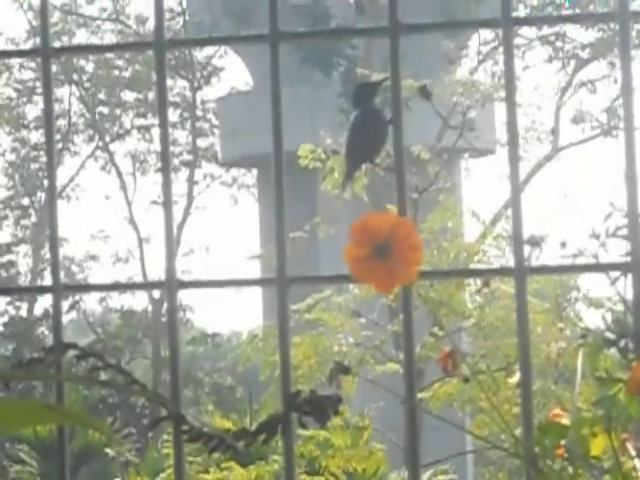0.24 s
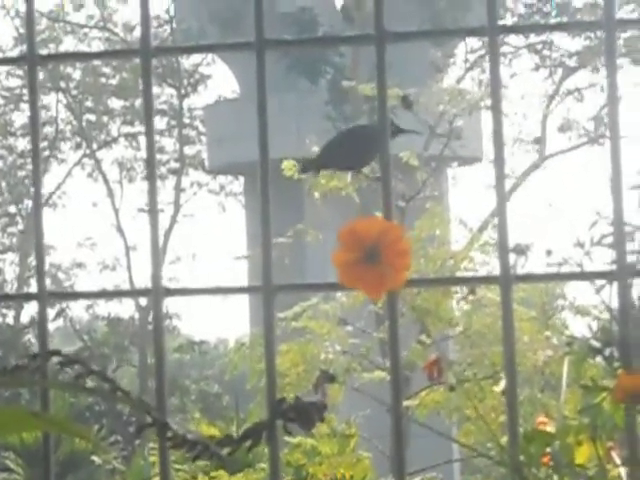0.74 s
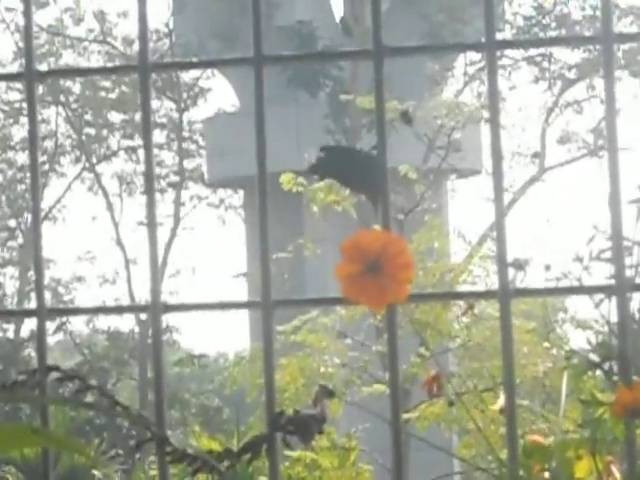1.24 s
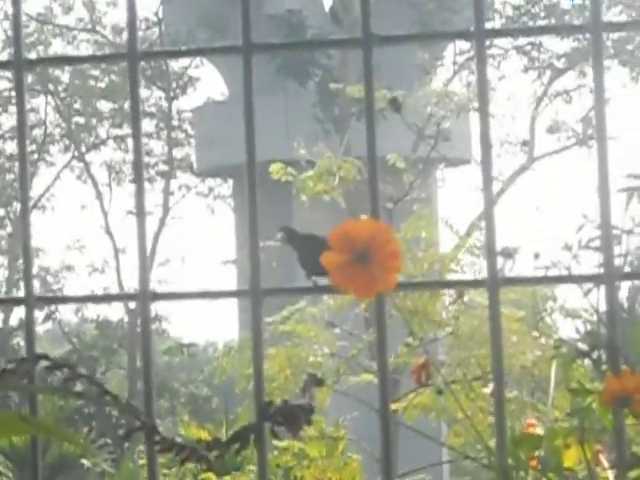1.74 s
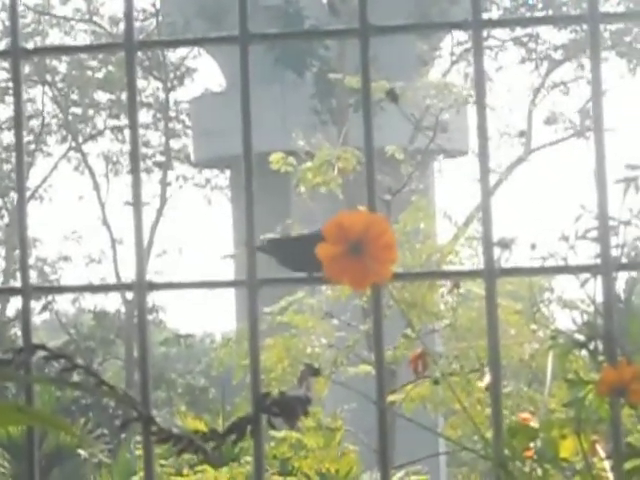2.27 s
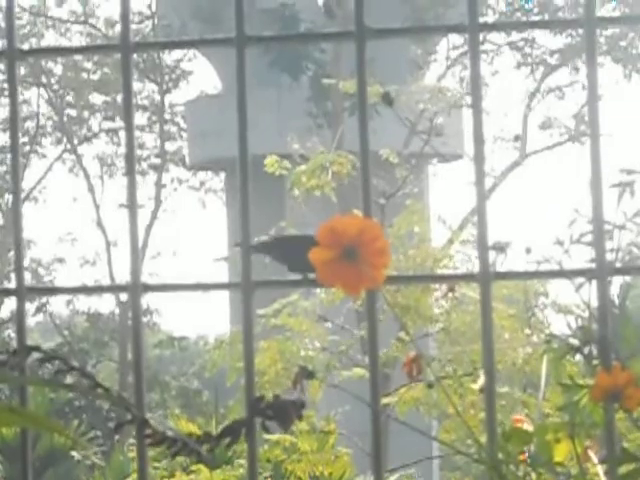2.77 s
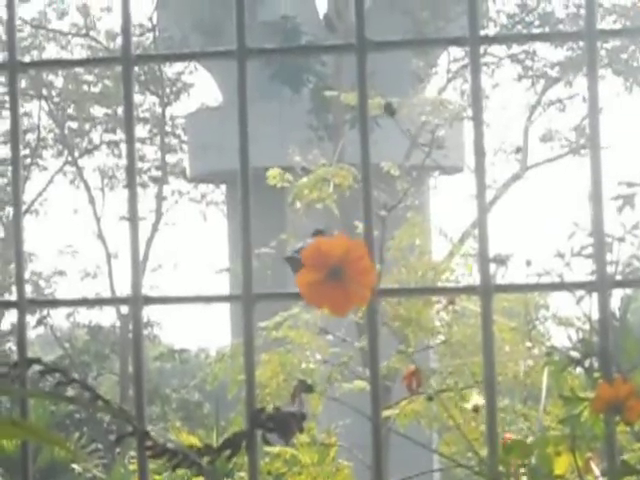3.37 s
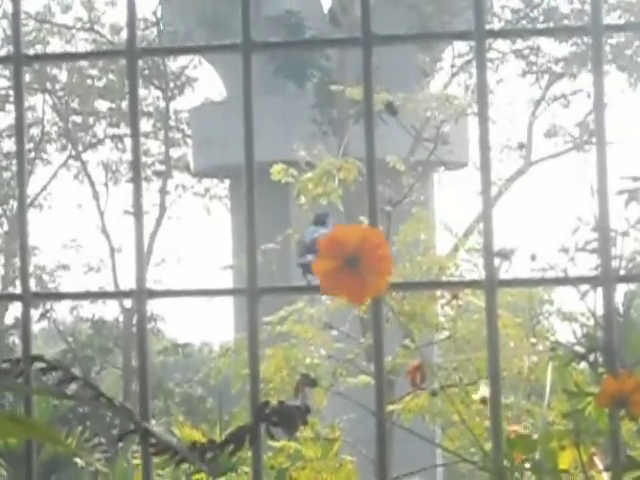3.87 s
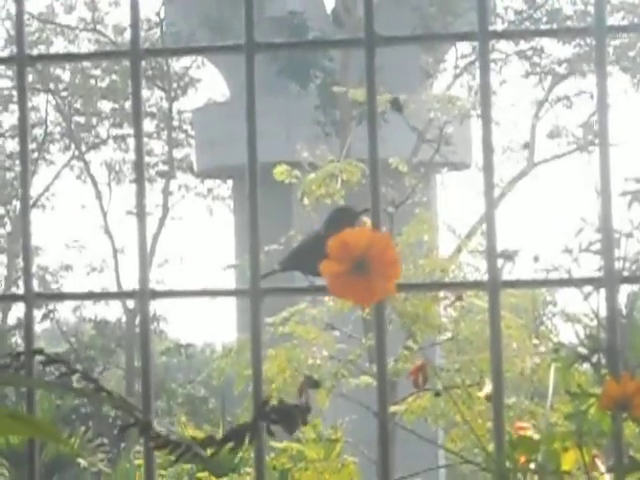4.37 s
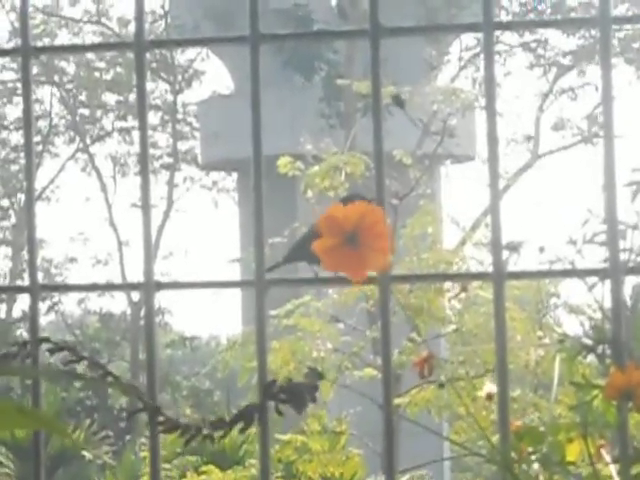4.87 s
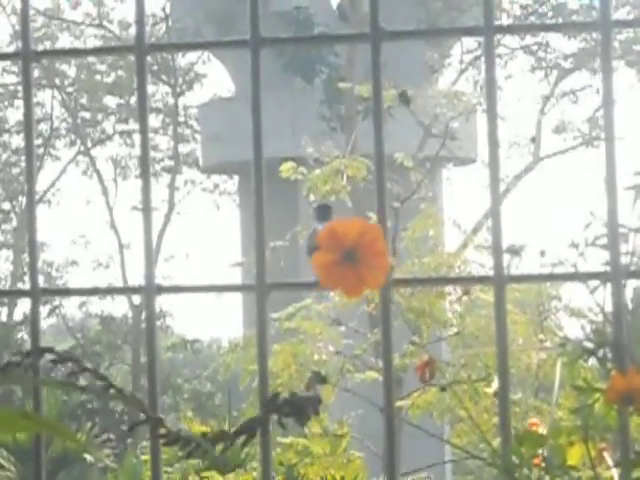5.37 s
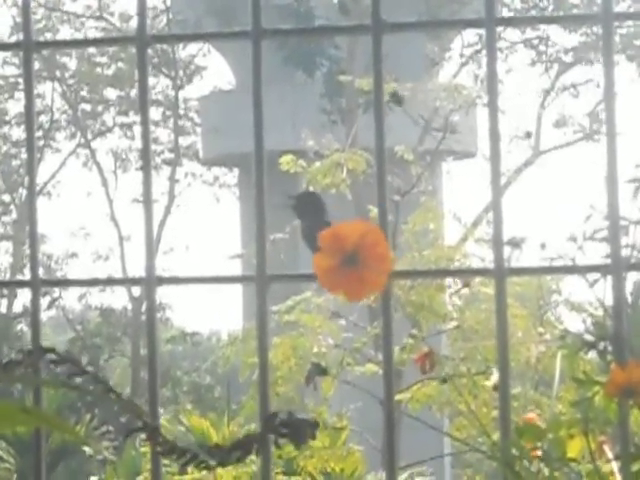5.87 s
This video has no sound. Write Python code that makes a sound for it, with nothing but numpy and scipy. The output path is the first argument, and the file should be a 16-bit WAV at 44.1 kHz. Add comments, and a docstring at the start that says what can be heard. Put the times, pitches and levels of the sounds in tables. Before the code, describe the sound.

Outdoor handheld pickup with a slightly rough, band-limited treble: low rumble, soft hiss and wind buffeting lie beneath a near bird's piercing upward chips. The calls are sparse at first, then repeat about every half second from the middle onward, with brief hard-surface reflections. Faint low chuckles and single pips from far birds continue throughout, with two soft coos and a few muffled thuds in the first half.

```python
"""A small bird close by gives rising chip calls: a harsh tick (shaped noise), a fast warble (frequency modulation),
then an upward whistle (a gliding tone with its octave) that ends in a puff of air. Walls throw each call back.
Far off, birds chuckle and pip and a dove-like voice coos (gliding near sines), and something thuds (dying noise).
Under it lie garden rumble, hiss and wind (filtered noise); this background drops half-way through."""
import sys
import numpy as np
from scipy import signal
from scipy.fft import rfft, irfft
from scipy.io import wavfile
from scipy.ndimage import uniform_filter1d

SR = 44100
rng = np.random.default_rng(int(sys.argv[2]) if len(sys.argv) > 2 else 0)


def dump_mix(stems):
    """Bounce the given channels to the path in sys.argv[1] as a 16-bit WAV at rate SR."""
    frames = np.atleast_2d(stems).T  # one column per channel
    limited = np.clip(frames, -1, 1)  # hard clip at full scale
    pcm = np.round(limited * 32767).astype(np.int16)
    wavfile.write(sys.argv[1], SR, pcm)


N = 269892
LEAD = SR // 10   # samples before time zero, for sounds already under way


def from_db(db):
    """Logarithmic level: decibels to amplitude gain."""
    return 10 ** (np.asarray(db) / 20)


def rms_one(x):
    """Normalisation of power: scales a signal to rms 1."""
    return x / np.sqrt(np.mean(x ** 2) + 1e-20)


def coloured(spectrum, size):
    """Spectral shaping: white noise weighted by (Hz, relative dB) points, rms 1."""
    hz = np.fft.rfftfreq(size, 1 / SR) + 1
    points = np.array(spectrum)
    gain = from_db(np.interp(np.log(hz), np.log(points[:, 0]), points[:, 1]))
    return rms_one(irfft(rfft(rng.standard_normal(size)) * gain, size))


def wobble(rate_hz, size):
    """Low-passed random fluctuation: sway mostly slower than rate_hz, rms 1."""
    lowpass = signal.butter(2, rate_hz, fs=SR, output="sos")
    settling = 4000   # samples thrown away
    return rms_one(signal.sosfilt(lowpass, rng.standard_normal(size + settling))[settling:])


def add(out, start_s, sound):
    """Superposition: mixes a sound into a buffer that begins before time zero."""
    i = LEAD + round(start_s * SR)
    out[i:i + len(sound)] += sound[:max(len(out) - i, 0)]


def sung(hz, level_db, overtone_db, edge_s):
    """Phase is the integral of frequency: a near sine with its octave, and a twelfth on low notes."""
    phase = 2 * np.pi * (np.cumsum(hz) / SR + rng.random())
    t = np.arange(len(hz)) / SR
    fade = np.clip(np.minimum(t, t[-1] - t) / edge_s, 0, 1)
    twelfth = 0.35 * np.sin(3 * phase) * (hz < 4000)
    overtones = from_db(overtone_db) * (np.sin(2 * phase) + twelfth)
    return np.sqrt(2) * fade * from_db(level_db) * (np.sin(phase) + overtones)


def echoes(x, t60_s, gap_s):
    """Reverberation as convolution: clumped, exponentially dying reflections after a gap, power 1."""
    t = np.arange(SR) / SR
    clumps = from_db(1.9 * wobble(210, SR))
    tail = rng.standard_normal(SR) * clumps * from_db(-60 * t / t60_s) * (t > gap_s)
    # walls and leaves swallow the treble
    tail = signal.sosfilt(signal.butter(2, 7500, fs=SR, output="sos"), tail)
    return signal.fftconvolve(x, tail / np.sqrt(np.sum(tail ** 2)))[:len(x)]


# Noise spectra of the background. Each row: frequency in Hz, relative density in dB per Hz.
RUMBLE_SPECTRUM = [(41, -38), (70, 1.5), (124, -3), (189, -1.5), (599, -4.5), (808, -5.5), (1200, -5),
                   (1800, -32), (2340, -33), (3960, -120)]
HISS_SPECTRUM = [(820, -33), (1400, -3), (2110, -4), (2520, -5), (3130, -6), (3960, -5), (4730, -7),
                 (6690, -9.5), (8700, -12.5)]
# Background levels, joined by straight lines.
# Each row: time in seconds, rumble in dB before its swell, hiss in dB, wind in dB before its gusts.
BACKGROUND_LEVELS = [(0, -44.5, -51, -54), (.5, -50.5, -53.5, -55.5), (1.05, -48.5, -50.5, -58.5),
                     (1.15, -46.5, -53.5, -52), (1.5, -45, -52, -49), (1.9, -49, -49.5, -50),
                     (2.7, -46.5, -49.5, -51), (3.37, -47, -46.5, -56), (3.385, -53, -54.5, -56),
                     (4.9, -56, -54.5, -67), (6.12, -53.5, -53.5, -58.5)]


def garden():
    """Broadband noise in three bands: traffic rumble, leaf and microphone hiss, lumpy wind on the port."""
    s, *levels = np.transpose(BACKGROUND_LEVELS)
    t = np.arange(N) / SR
    rumble_db, hiss_db, wind_db = [np.interp(t, s, column) for column in levels]
    swell_db = .9 * wobble(5, N)
    gusts_db = 2.7 * wobble(4.2, N)
    rumble = from_db(rumble_db + swell_db) * coloured(RUMBLE_SPECTRUM, N)
    hiss = from_db(hiss_db) * coloured(HISS_SPECTRUM, N)
    wind = coloured([(14, -27.5), (25, 1.0), (48, -3.0), (90, -30.0)], N)
    return rumble + hiss + from_db(wind_db + gusts_db) * wind


# Spectrum of a dull blow. Each row: frequency in Hz, relative density in dB per Hz.
THUD_SPECTRUM = [(200, -19), (380, 2), (550, 8), (800, 0.5), (1200, 6), (1600, -5), (2300, -30)]
# Far blows. Each row: start in seconds, relative level in dB.
THUD_STARTS = [(-.02, -45), (.982, -39.5), (1.06, -45)]


def thuds():
    """Double-slope decay: dull blows far away, with a sharp start and a rolling tail."""
    out, t = np.zeros(N + LEAD), np.arange(SR // 2) / SR
    for start_s, level_db in THUD_STARTS:
        dying = from_db(-60 * t / 0.43) + .5 * from_db(-60 * t / 0.93)
        attack = np.minimum(t / 0.0032, 1)
        add(out, start_s, from_db(level_db) * attack * dying * coloured(THUD_SPECTRUM, len(t)))
    return out


# Far coos and thin whistles. Each row: start in seconds, length in seconds, starting pitch in Hz,
# slide in Hz per second, starting level in dB before flutter, level change in dB per second.
COOS_AND_THIN_WHISTLES = [(1.602, 0.7, 761.4, -140, -53.5, 2), (2.66, 0.64, 776.6, -170, -48.5, -12.5),
                          (.2, 0.081, 4350, 900, -59, -40), (0.467, 0.06, 4340, -1500, -57, -250),
                          (0.815, 0.066, 6050, -500, -48, -75), (.905, 0.17, 6020, 145, -58, -51),
                          (2.43, 0.081, 2680, -4000, -55.5, -40), (2.79, 0.071, 4250, -9000, -56.5, -38)]


def coos_and_thin_whistles():
    """Slow frequency and amplitude modulation: wavering, sliding notes from far birds."""
    out = np.zeros(N + LEAD)
    for start_s, length_s, hz, slide, level_db, fade in COOS_AND_THIN_WHISTLES:
        t = np.arange(0, length_s, 1 / SR)
        flutter_db = 3.5 * wobble(45, len(t))
        wavering_hz = hz + slide * t + hz ** .5 * wobble(60, len(t))
        add(out, start_s, sung(wavering_hz, level_db + fade * t + flutter_db, -37.5, 0.0088))
    return out


# Two phrases of three notes that one far bird alternates.
# Each row: delay after the phrase start in seconds, pitch in Hz early in the note, relative level in dB.
CHUCKLE_NOTES = [(0, 1256, -0.5), (.092, 1060, 0), (.16, 1203, -4)]
TUMBLE_NOTES = [(0, 1220, 0), (.082, 1070, -1.2), (.168, 1100, -1.5)]
# Starts of the two phrases, and of a second far bird's single higher note at a steady pace.
# Each row: start in seconds, relative level in dB.
CHUCKLE_STARTS = [(-.05, -41), (.74, -44), (1.489, -49), (2.247, -39.5), (3.026, -38), (3.783, -46),
                  (4.551, -47), (5.325, -44), (6.074, -43.5)]
TUMBLE_STARTS = [(.31, -46), (1.81, -46), (1.89, -45), (2.662, -39.5), (3.446, -45), (4.222, -44.5),
                 (4.995, -47), (5.771, -48)]
PIP_STARTS = [(.798, -43), (1.647, -41.5), (2.502, -38.5), (3.369, -47), (4.224, -46.5), (5.069, -51.5),
              (5.908, -51)]
PIP_HZ, NOTE_SPREAD_DB = 1330, 1.5
CHUCKLE_FALL, TUMBLE_FALL, PIP_FALL = 4.8, 9.3, 6.4   # fraction of the pitch lost per second


def chuckles_and_pips():
    """Downward frequency glide: short falling notes in chuckles, tumbles and pips."""
    out, t = np.zeros(N + LEAD), np.arange(0, .035, 1 / SR)
    phrases = [(CHUCKLE_NOTES, CHUCKLE_FALL, CHUCKLE_STARTS),
               (TUMBLE_NOTES, TUMBLE_FALL, TUMBLE_STARTS),
               ([(0, PIP_HZ, 0)], PIP_FALL, PIP_STARTS)]
    for notes, fall, starts in phrases:
        for start_s, phrase_db in starts:
            for delay_s, hz, note_db in notes:
                level_db = phrase_db + note_db - 7.5 + NOTE_SPREAD_DB * rng.standard_normal()
                falling_hz = hz * (1 - fall * (t - .014))
                add(out, start_s + delay_s - .004, sung(falling_hz, level_db, -28.5, 0.011))
    return out


# Harsh ticks that open the calls. Each row: start in seconds, relative level in dB, centre of the band in Hz.
TICK_STARTS = [(0.749, -44, 6400), (1.328, -34, 5480), (3.216, -30, 5300), (3.547, -36.5, 5220),
               (3.895, -36, 4960), (4.518, -36, 5380), (5.125, -36, 5130), (5.706, -35.5, 5370),
               (6.033, -34, 5240)]


def ticks():
    """Band-limited noise burst: a rasp that swells quickly and closes more slowly."""
    out, t = np.zeros(N + LEAD), np.arange(0, .04, 1 / SR)
    for start_s, level_db, hz in TICK_STARTS:
        band = [(0.5 * hz, -36), (0.82 * hz, 0), (1.17 * hz, -3), (1.5 * hz, -15), (1.99 * hz, -24)]
        swell = np.sin(np.pi * (t / t[-1]) ** 0.6)
        add(out, start_s, from_db(level_db) * swell * coloured(band, len(t)))
    return out


# Warbles between tick and whistle.
# Each row: start in seconds, length in seconds, relative level in dB, low pitch in Hz before jitter.
WARBLE_STARTS = [(0.784, 0.017, -40, 4750), (.785, 0.048, -55.5, 2470), (1.367, 0.028, -40.5, 2940),
                 (3.265, 0.013, -37, 3620), (3.588, 0.033, -32.5, 3580), (3.932, 0.035, -33, 3705),
                 (4.558, 0.035, -29.5, 3930), (5.159, 0.037, -31.5, 3810), (5.741, 0.033, -25.5, 4094),
                 (6.063, 0.041, -30.5, 3780)]
SWINGS_PER_S, WARBLE_SPAN = 62, 1.62   # the span is high pitch over low pitch


def warbles():
    """Periodic frequency modulation: the voice swings fast between two pitches, weaker at the upper."""
    out = np.zeros(N + LEAD)
    for start_s, length_s, level_db, low_hz in WARBLE_STARTS:
        t = np.arange(0, length_s, 1 / SR)
        range_hz = WARBLE_SPAN * low_hz - low_hz
        swing = np.abs(np.cos(np.pi * SWINGS_PER_S * t)) ** 1.8
        hz = low_hz + range_hz * swing + 170 * wobble(1100, len(t))
        growth_db = 3.1 * (t / length_s - .5)
        tilt_db = -1.9 * (hz - low_hz) / range_hz
        flicker_db = 0.34 * wobble(300, len(t))
        add(out, start_s, sung(hz, level_db + growth_db + tilt_db + flicker_db, -17, 0.0024))
    return out


RISE_BEND = 1.2   # above 1 the slow rise steepens
ENTRY_HZ, ENTRY_S = 4030, 0.0066   # whistles starting below this pitch drop in from it, with this time constant
CREEP_HZ_PER_S, SAG_DB_PER_S = 7600, -120   # from the top of the flick to the end
RELEASE_S, RELEASE_DB = 0.0054, -21
OCTAVE_GROWS_DB, OCTAVE_FLICKER_DB = 6.5, 4.0   # growth from start pitch to top pitch; rms flicker


def whistle(start_hz, rise_s, knee_hz, flick_s, top_hz, hold_s, start_db, knee_db, top_db, octave_db):
    """Piecewise pitch glide: slow rise, quick flick, hold, release; the octave grows with the climb."""
    t = np.arange(0, rise_s + flick_s + hold_s + RELEASE_S, 1 / SR)
    rise = np.minimum(t / rise_s, 1)
    flick = np.clip((t - rise_s) / flick_s, 0, 1)
    held_s = np.maximum(t - rise_s - flick_s, 0)
    released = np.clip((t - t[-1]) / RELEASE_S + 1, 0, 1)
    hz = start_hz + (knee_hz - start_hz) * rise ** RISE_BEND + (top_hz - knee_hz) * flick
    hz += CREEP_HZ_PER_S * held_s
    level_db = start_db + (knee_db - start_db) * rise + (top_db - knee_db) * flick
    level_db += SAG_DB_PER_S * held_s + RELEASE_DB * released
    climb = (hz - start_hz) / (top_hz - start_hz)
    octave_db = octave_db + OCTAVE_GROWS_DB * climb + OCTAVE_FLICKER_DB * wobble(80, len(t))
    entry_hz = max(ENTRY_HZ - start_hz, 0) * np.exp(-t / ENTRY_S)
    return hz + entry_hz, level_db, octave_db


# Whistles of the near bird. Each row: start in seconds, start pitch in Hz, slow rise in seconds,
# pitch reached in Hz, flick in seconds, top pitch in Hz, hold in seconds, then relative levels in dB at the start,
# at the flick and at the top, and the octave's level at the start in dB relative to the note.
WHISTLE_SHAPES = [(-.09, 4060, 0.058, 4965, .022, 5740, 0.01, -23, -21.5, -21, -17),
                  (.78, 3122, 0.093, 4380, 0.0248, 5063, 0.019, -35.5, -22.5, -14.5, -22.5),
                  (1.378, 3396, .075, 4070, .047, 5217, 0.0046, -32, -17, -16, -33),
                  (3.261, 3467, 0.095, 4710, 0.031, 6005, 0.0013, -22.5, -12.5, -14.5, -32.5),
                  (3.622, 4286, .075, 5120, 0.024, 5703, 0.0063, -20, -17, -12.5, -32.5),
                  (3.964, 4504, 0.075, 4957, 0.026, 5830, 0.0074, -21.5, -20, -16.5, -31),
                  (4.595, 4703, .075, 5080, 0.022, 5776, 0.0047, -22, -18, -11, -31.5),
                  (5.194, 4525, 0.085, 4980, 0.022, 5695, .004, -21, -19.5, -13, -30),
                  (5.777, 4623, 0.054, 4815, .032, 5760, 0.02, -21, -19, -14.5, -31.5),
                  (6.093, 4244, 0.075, 4700, 0.018, 5750, .008, -25.5, -17, -14, -28)]
# closing puff: level against the whistle's peak when it ends at this pitch; weaker under lower notes
PUFF_DB, PUFF_DB_PER_KHZ, PUFF_PITCH_HZ = -22.5, 14, 5730


def whistles():
    """Tonal source with turbulence: a rising whistle with a hoarse start, closed by a puff of air."""
    out = np.zeros(N + LEAD)
    for start_s, *shape in WHISTLE_SHAPES:
        hz, level_db, overtone_db = whistle(*shape)
        smooth_hz = uniform_filter1d(hz, size=300, mode="nearest") + 12 * wobble(300, len(hz))
        hoarseness = np.exp(-np.arange(len(hz)) / SR / 0.02)
        smooth_hz += 170 * hoarseness * wobble(600, len(hz))
        add(out, start_s, sung(smooth_hz, level_db - 3.5, overtone_db, 0.0014))
        puff = np.hanning(1000) * coloured([(5000, -27), (6700, 9.0), (7800, -8.0), (12000, -0.5)], 1000)
        puff_db = level_db.max() + PUFF_DB + PUFF_DB_PER_KHZ * (hz[-1] - PUFF_PITCH_HZ) / 1e3
        add(out, start_s + len(hz) / SR - .025, from_db(puff_db) * puff)
    return out


WALLS_T60_S, WALLS_DB, YARD_T60_S, YARD_DB = 0.13, -2, 0.35, -16


def scene():
    """Direct plus reflected sound: near bird with walls and yard, far birds with a longer tail, dry thuds."""
    far = coos_and_thin_whistles() + chuckles_and_pips()
    far = far + from_db(-8.5) * echoes(far, 0.86, 0.0065)
    bird = ticks() + warbles() + whistles()
    walls = from_db(WALLS_DB) * echoes(bird, WALLS_T60_S, 0.0048)
    yard = from_db(YARD_DB) * echoes(bird, YARD_T60_S, 0.024)
    near = from_db(-2.0) * bird + walls + yard
    return ((near + far + thuds())[LEAD:] + garden())[None]


CUTOFF_HZ = 12150


def record(dry):
    """Aliasing: half-rate sampling with soft filters folds the top about SR / 4; then the top is cut."""
    softened = signal.sosfilt(signal.butter(5, 10800, fs=SR, output="sos"), dry)
    halved = softened * (1 + (-1) ** np.arange(N))   # every other sample doubled, the rest zero
    rebuilt = signal.sosfilt(signal.cheby2(6, 15, 10950, fs=SR, output="sos"), halved)
    return signal.sosfilt(signal.ellip(10, .5, 70, CUTOFF_HZ, fs=SR, output="sos"), rebuilt)


dry = scene()
out = record(dry)
dump_mix(out)
```